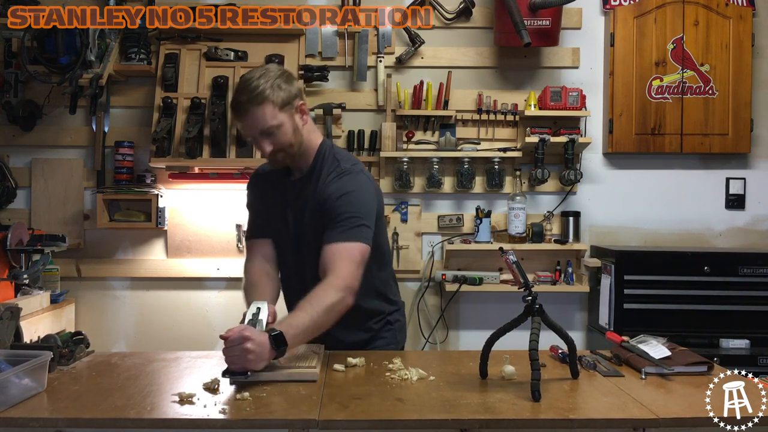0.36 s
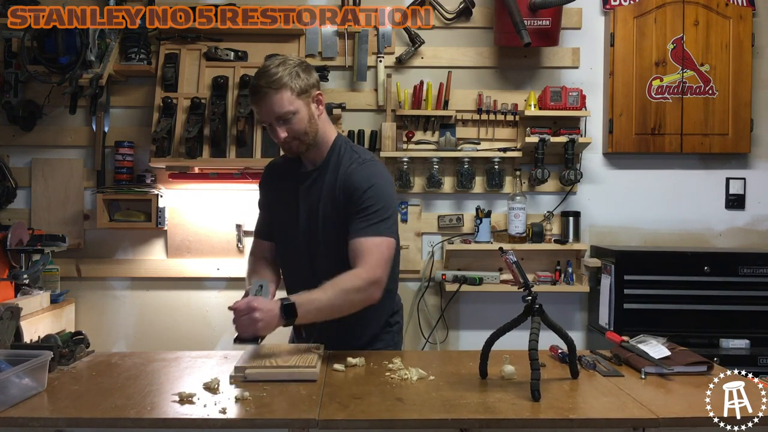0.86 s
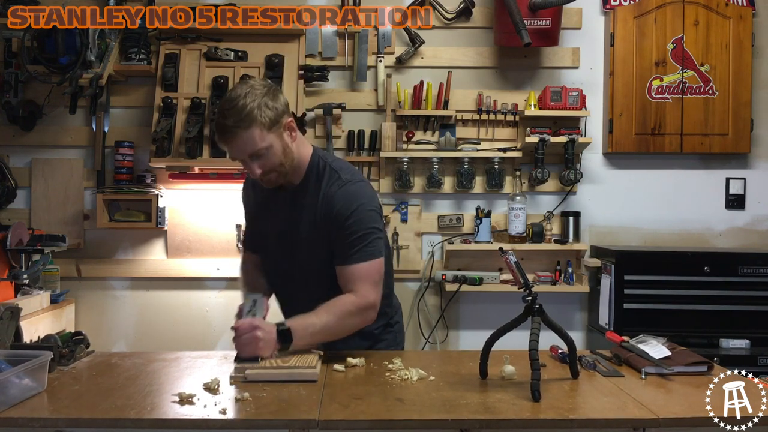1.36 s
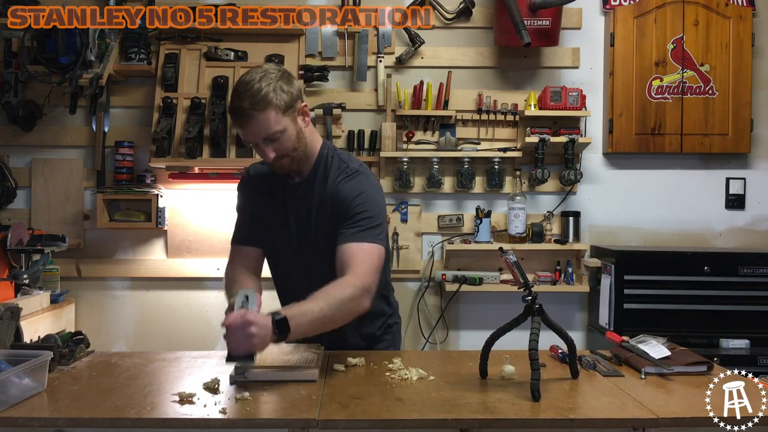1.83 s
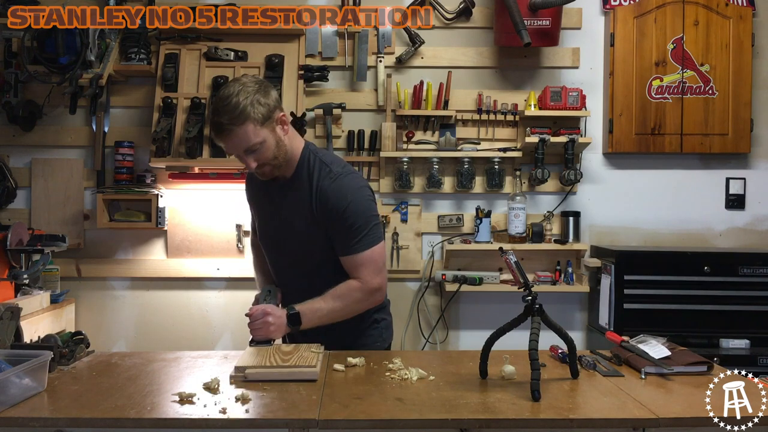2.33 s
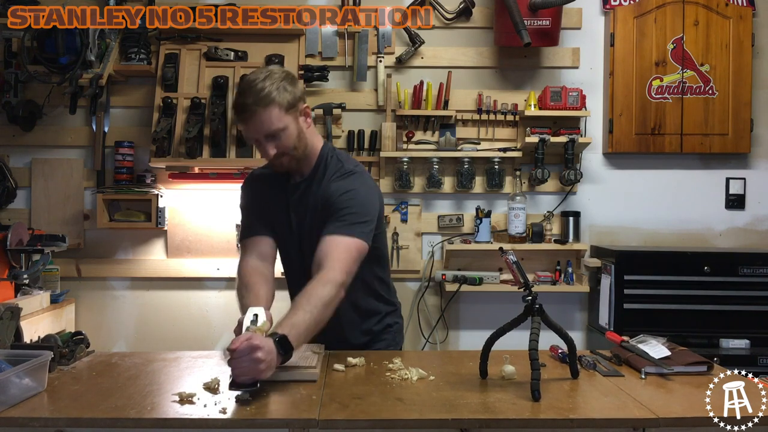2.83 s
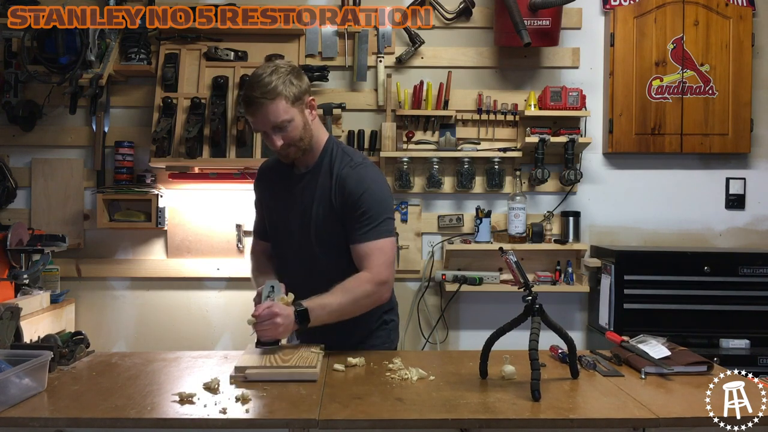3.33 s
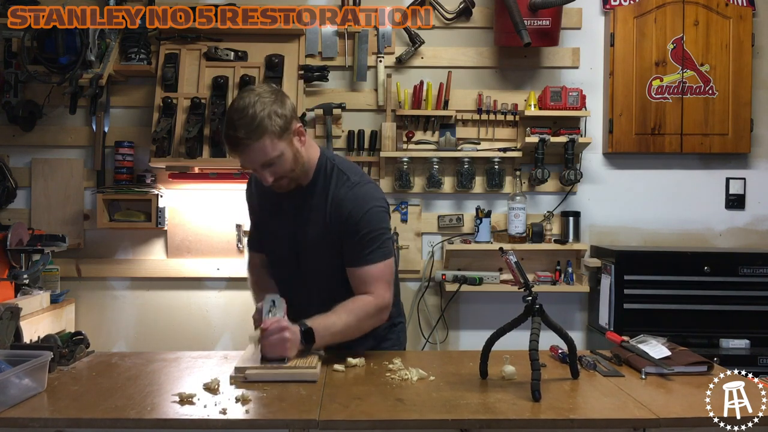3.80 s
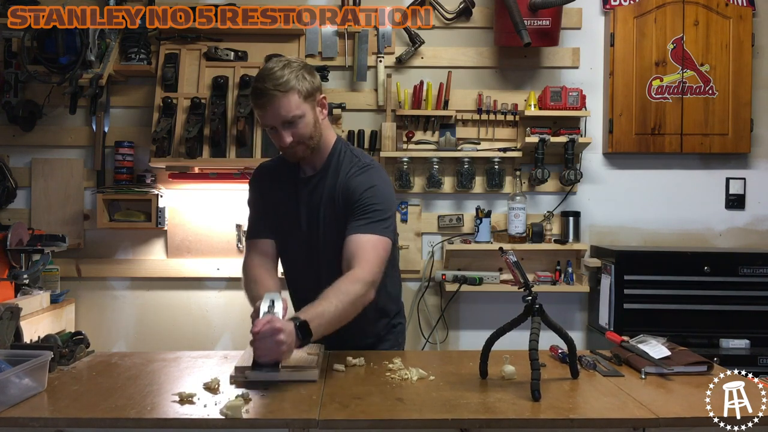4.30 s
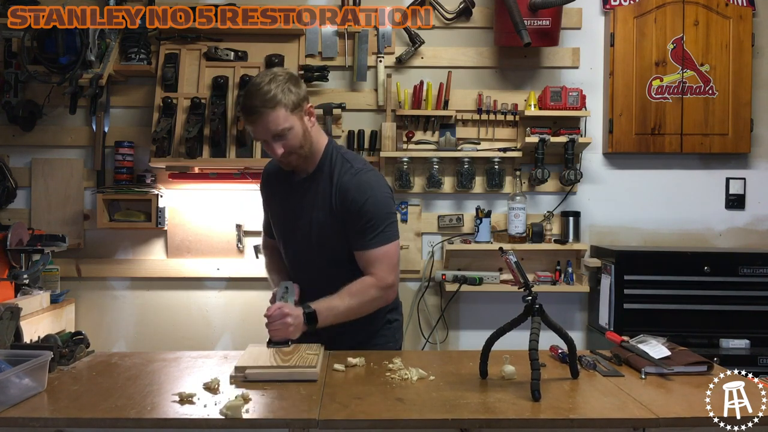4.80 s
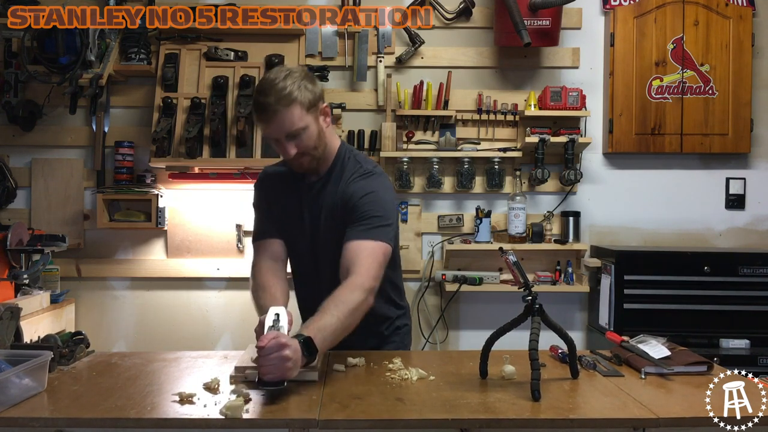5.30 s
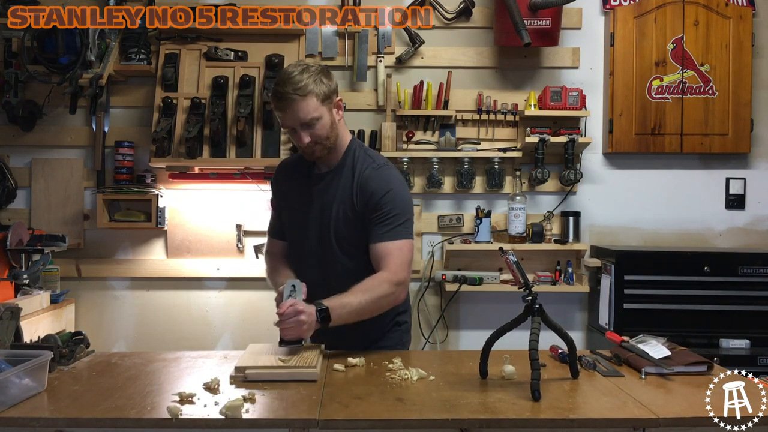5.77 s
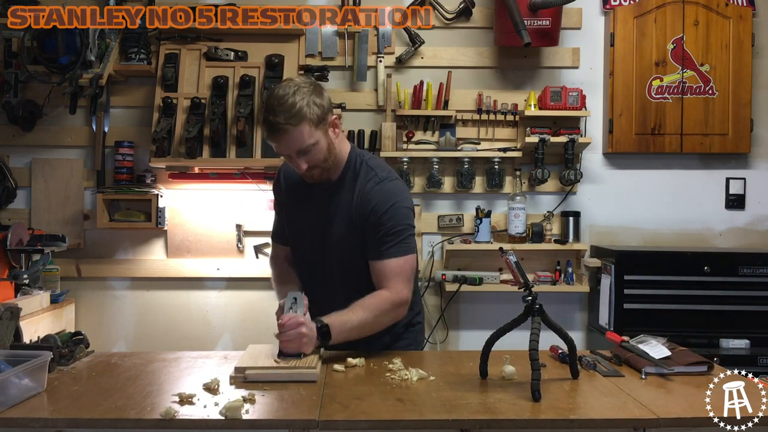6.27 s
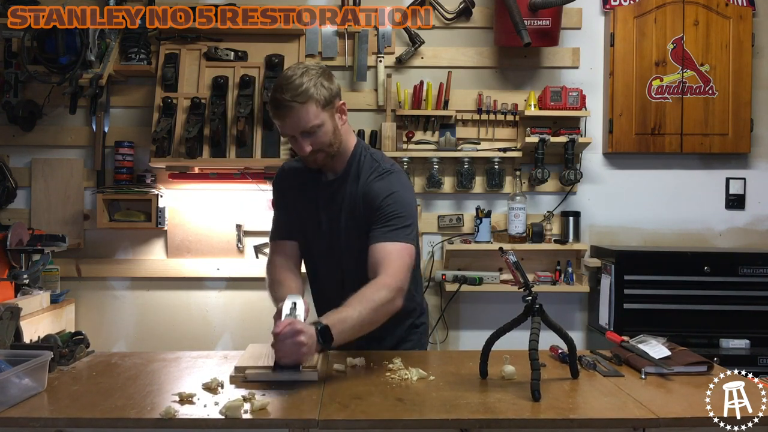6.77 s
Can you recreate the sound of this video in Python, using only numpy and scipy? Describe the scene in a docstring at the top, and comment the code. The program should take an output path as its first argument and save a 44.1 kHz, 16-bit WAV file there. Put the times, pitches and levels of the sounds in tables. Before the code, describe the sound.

In a small workshop, a hand plane shaves a short board on a bench. Six short, bright, ripping hisses come evenly, the first stalling into a ragged falling chatter. Between strokes the sole slides back almost inaudibly, then clacks onto the wood as the bench thumps. A short room tail follows over soft air noise and a distant low hum, picked up in stereo by a phone fairly near.

```python
"""In a small workshop a hand plane works a short board on a bench: the iron tears shavings off with a bright hiss,
made of random breaks over ringing iron modes; it chatters in the first stroke and the sole slides faintly between.
Clacks ring the board, shoves thump and rumble the bench, and the shop answers with a decaying noise tail.
Behind lie air noise and a machine's far hum; the phone's stereo stage turns the treble phase between channels."""
import sys
import numpy as np
from scipy import signal
from scipy.fft import rfft, irfft, next_fast_len
from scipy.io import wavfile
from scipy.ndimage import map_coordinates

SR = 44100
rng = np.random.default_rng(int(sys.argv[2]) if len(sys.argv) > 2 else 0)


def rack_gain(trim_db):
    """Turn a fader trim in dB into the linear factor to multiply a signal by."""
    fader = np.asarray(trim_db, float)
    return 10 ** (fader / 20)


def store_pcm(level_fs):
    """Save levels as 16-bit WAV."""
    pcm = np.round(np.clip(level_fs, -1, 1) * 32767).astype(np.int16)
    wavfile.write(sys.argv[1], SR, np.atleast_2d(pcm).T)


N = 303849


def unit(x):
    """Scaled to rms 1."""
    return x / np.sqrt(np.mean(x ** 2) + 1e-20)


def along(points, hz):
    """(Hz, value) points read on a log frequency axis."""
    f, v = np.transpose(points)
    return np.interp(np.log(hz + 1), np.log(f + 1), v)


def curves(rows):
    """One value per sample for each column after the time."""
    s, *columns = np.transpose(rows)
    return [np.interp(np.arange(N) / SR, s, column) for column in columns]


def during(tables):
    """A gate: one while any table lasts, rising 3 ms ahead of it and fading for 20 ms after it."""
    t = np.arange(N) / SR
    gates = []
    for rows in tables:
        start, end = rows[0][0], rows[-1][0]
        gates.append(np.clip(np.minimum((t - start) / .003, (end - t) / .02) + 1, 0, 1))
    return np.max(gates, axis=0)


def wobble(rate, size=N):
    """A smooth random curve, rate knots a second."""
    knots = rng.standard_normal(int(size * rate / SR) + 4)
    return map_coordinates(knots, [np.arange(size) * rate / SR])


def filtered(x, response):
    """x times a complex response of frequency."""
    m = next_fast_len(x.shape[-1] + 8192)
    return irfft(rfft(x, m) * response(np.fft.rfftfreq(m, 1 / SR)), m)[..., :x.shape[-1]]


def resonances(modes):
    """Causal response of (Hz, width Hz, dB) modes of alternating sign."""
    def response(f):
        return sum((-1) ** k * rack_gain(db) * 1j * f * width / (centre * centre - f * f + 1j * f * width)
                   for k, (centre, width, db) in enumerate(modes))
    return response


def grit(spectrum, spiky_db, clump_db):
    """Tiny breaks of uneven size whose strength wavers in clumps, coloured, rms 1."""
    size_db = spiky_db * np.minimum(rng.exponential(size=N), 6) + clump_db * wobble(220)
    breaks = rng.standard_normal(N) * rack_gain(size_db)
    return unit(filtered(breaks, lambda hz: rack_gain(along(spectrum, hz))))


# the cut, one list a stroke from bite to far edge: t/s, relative shaving level/dB,
# fibre tearing rate f/Hz, crispness of the curl as relative level/dB
CUTS = [
    [(0.0, -29, 3755, -1), (0.048, -31, 4130, -3.5), (0.062, -35.5, 4020, 3), (0.104, -38.5, 4320, 4.5),
     (0.138, -22.5, 4290, 1), (0.168, -29, 4350, 1), (0.206, -41, 4200, -0.5), (0.248, -48, 3403, 2),
     (0.31, -57.5, 3930, 1.5), (0.4, -42, 4216, 6)],
    [(1.352, -29.5, 3880, -4.5), (1.402, -31.5, 4605, 5), (1.436, -35.5, 4070, 3.5),
     (1.456, -20, 4150, -3.5), (1.475, -33.5, 4140, 2.5)],
    [(2.503, -19, 4240, -2.5), (2.509, -30, 4230, 1.5), (2.521, -20.5, 4310, 1.5), (2.553, -24.5, 4247, 1),
     (2.677, -21, 4340, -2.5), (2.699, -23, 4210, 0.5), (2.752, -25, 4710, 2.5)],
    [(3.755, -26, 3920, -5.5), (3.761, -38.5, 3884, 0), (3.795, -39.5, 4740, -2), (3.825, -24, 4550, 3),
     (3.871, -29, 3674, 1.5), (3.895, -28.5, 4950, 5), (3.925, -20, 5150, 0)],
    [(4.996, -27, 4390, -3.5), (5.002, -27, 4420, -3.5), (5.03, -29.5, 4040, -1), (5.058, -26.5, 4120, 2),
     (5.12, -31.5, 4330, 5), (5.152, -28, 3850, 3.5), (5.198, -29.5, 4710, 4), (5.215, -31, 4640, -2.5)],
    [(6.234, -24.5, 3900, -5.5), (6.236, -20.5, 4120, -5.5), (6.298, -36, 3730, 10),
     (6.34, -23.5, 3660, -1.5), (6.392, -38.5, 3950, -1), (6.41, -28.5, 4000, 4.5), (6.448, -27, 4730, -1)],
]
# how each stroke sits on the wood, relative levels: lead-in level/dB, trail level/dB, then
# board scrape level/dB, bench rumble level/dB, treble fizz level/dB at the reference shaving level
WOOD_GRAIN = [(-60, -47, -39, -44, -49.5), (-42, -48.5, -45, -47, -41.5),
              (-41.5, -37.5, -40.5, -52.5, -49.5), (-46.5, -36, -40, -50, -45.5),
              (-45, -36, -42.5, -45, -45.5), (-60.5, -39, -37.5, -44, -45)]
LEAD_S, LEAD_SWELL_DB = .09, 8.5  # the sole gathers speed before the bite
# past the edge the cut stops and the shaving trails off
LIFT_S, EASE_S, EASE_DB, TRAIL_S, TRAIL_END_DB = .02, 0.055, -4, 0.23, -25


def pressure():
    """Shaving level, tearing rate and crispness through lead-in, cut and trail, with each stroke's grain."""
    spans = []
    for cut, (lead_db, trail_db, *grain) in zip(CUTS, WOOD_GRAIN):
        bite, _, *first = cut[0]
        edge, _, *last = cut[-1]
        lead = [(bite - LEAD_S, lead_db - LEAD_SWELL_DB, *first), (bite - .004, lead_db, *first)]
        fall = [(LIFT_S, 0), (EASE_S, EASE_DB), (TRAIL_S, TRAIL_END_DB)]
        trail = [(edge + s, trail_db + db, *last) for s, db in fall]
        spans.append([(*row, *grain) for row in lead + list(cut) + trail])
    return spans


# modes of the loaded plane and board: f/Hz, width f/Hz, relative level/dB
PLANE_MODES = [(162, 29, 3), (314, 49, -3.5), (508, 31, -1), (750, 160, -3), (1135, 89, 4),
               (1660, 120, -2.5), (2310, 74, 4.5), (2750, 48, 0.5), (3030, 240, 4.5), (3630, 470, -2.5),
               (4140, 297, 0), (4507, 290, -3), (5010, 300, 0), (5630, 100, 4), (6220, 200, -2)]


def woken(hz, scatter, flare_db, rate):
    """Slips repeating near hz excite the modes close to that rate; the modes flare and share a steady power."""
    out, power = np.zeros(len(hz)), 1e-12
    for mode_hz, width_hz, db in PLANE_MODES:
        nearness = np.exp(-.5 * (np.log(mode_hz / hz) / np.maximum(scatter, .02)) ** 2)
        share = nearness * rack_gain(db + flare_db * wobble(rate, size=len(hz)))
        ring = filtered(rng.standard_normal(len(hz)), resonances([(mode_hz, width_hz, 0)]))
        out += share * unit(ring)
        power += share ** 2
    return out / np.sqrt(power)


# colour of the shaving's hiss: f/Hz, relative level/dB
SHAVING_COLOUR = [(1200, -41.5), (2200, -9), (3300, 5), (4200, -8.5), (6000, -2), (7500, 10.5), (9000, -31)]
# colour of its treble fizz: f/Hz, relative level/dB
FIZZ_COLOUR = [(6000, -25.5), (7500, 9.5), (8500, 6.5), (10000, 1), (11500, -3), (13000, -4.5),
               (15800, 1.5)]
# colour of the board's scrape: f/Hz, relative level/dB
SCRAPE_COLOUR = [(250, -20.5), (500, -10.5), (800, -6.5), (1150, -5), (1500, -5), (1900, -4.5),
                 (2400, -5.5), (3200, -11.5), (5000, -65)]
# colour of the bench's rumble: f/Hz, relative level/dB
RUMBLE_COLOUR = [(25, -34), (60, 0.5), (100, -5), (150, -1), (200, -2.5), (300, -9), (500, -12.5),
                 (900, -35.5)]
# the iron catches and drags the board: t/s, scrape level/dB, width t/s of the bell-shaped swell
DRAGS = [(0.0, -31, .04), (0.176, -32.5, 0.024), (0.389, -43, 0.0086), (1.455, -38.5, .015),
         (1.551, -40.5, .02), (2.51, -36, .015), (2.691, -42.5, 0.02), (3.921, -36.5, 0.0096),
         (5.13, -42.5, 0.022), (5.2, -28, 0.014), (6.56, -65, 0.021)]
REFERENCE_DB = -35  # shaving level at which the grain levels hold
SCRAPE_FOLLOWS, RUMBLE_FOLLOWS, FIZZ_FOLLOWS = 0.6, 0.34, 1  # dB per dB of shaving
RING_GROWS = .4  # dB per dB: the iron rings mostly under a full cut
SHOVE_RUMBLE_DB, SHOVE_RISE_S, SHOVE_T60_S = -10.5, 0.01, 0.21  # the bench rattles on after each shove
TEAR_SCATTER = .2  # spread of the tearing rate, as a share


def strokes():
    """Fibres tear at a set rate and ring the iron, over random breaks; board and bench shake along."""
    spans, t = pressure(), np.arange(N) / SR
    shaving_db, tear_hz, crisp_db, scrape_db, rumble_db, fizz_db = curves(sum(spans, []))
    load_db = shaving_db - REFERENCE_DB
    caught = sum(rack_gain(db) * np.exp(-.5 * ((t - s) / width) ** 2) for s, db, width in DRAGS)
    shaken = np.zeros(N)
    for s, db, _ in SHOVES:
        rise = np.clip((t - s) / SHOVE_RISE_S, 0, 1)
        shaken += rise * rack_gain(db + SHOVE_RUMBLE_DB - 60 * np.abs(t - s) / SHOVE_T60_S)

    fibres = unit(woken(tear_hz, TEAR_SCATTER, flare_db=4, rate=70) * rack_gain(3 * wobble(200)))
    hiss = rack_gain(-4.5) * grit(SHAVING_COLOUR, spiky_db=0.5, clump_db=0.5)
    ring = rack_gain(-2.5 + RING_GROWS * np.minimum(load_db, 8)) * fibres
    shaving = rack_gain(shaving_db) * (hiss + ring)
    fizz_level = rack_gain(fizz_db + crisp_db + 9.5 + FIZZ_FOLLOWS * load_db)
    fizz = fizz_level * grit(FIZZ_COLOUR, spiky_db=3, clump_db=2.5)
    scrape_level = rack_gain(scrape_db - 7.5 + SCRAPE_FOLLOWS * load_db) + caught
    scrape = scrape_level * grit(SCRAPE_COLOUR, spiky_db=2.0, clump_db=4.5)
    rumble_level = rack_gain(rumble_db - 3.0 + RUMBLE_FOLLOWS * load_db) + shaken
    rumble = rumble_level * grit(RUMBLE_COLOUR, spiky_db=1.5, clump_db=3)
    return during(spans) * (shaving + fizz + scrape + rumble)


# the iron chatters as the first stroke stalls: t/s, relative level/dB
STALL = [(.12, -65.5), (.14, -31), (.16, -26.5), (.19, -16), (.205, -33), (.222, -26.5), (.25, -36),
         (.295, -31), (.335, -37), (.38, -26), (.42, -53.5)]
SKIP_START_HZ, SKIP_END_HZ, SKIP_SLOWS_S = 4300, 167.8, .051  # the rate sinks to its end value
SKIP_SCATTER = .27  # spread of the skipping rate, as a share


def chatter():
    """The stalling iron skips at a falling, ragged rate, all within the first half second."""
    since = np.arange(SR // 2) / SR - STALL[0][0]
    hz = np.maximum(SKIP_START_HZ * np.exp(-since / SKIP_SLOWS_S), SKIP_END_HZ)
    skips = woken(hz, SKIP_SCATTER, flare_db=3, rate=30)
    level = rack_gain(curves(STALL)[0] - 1.5)
    return during([STALL]) * level * np.pad(skips, (0, N - len(skips)))


# the sole slides over the board between strokes: start t/s, end t/s, relative hiss level/dB at start, at end
GLIDES = [(0.571, 0.636, -72.5, -90.5), (0.674, 1.19, -75, -87), (2.15, 2.27, -81, -77.5),
          (2.294, 2.412, -90, -76.5), (3.231, 3.301, -93, -92), (3.376, 3.466, -93, -92.5),
          (3.521, 3.692, -81.5, -69.5), (4.192, 4.821, -77.5, -79), (5.412, 5.717, -82, -87),
          (5.813, 5.991, -95, -72.5), (6.042, 6.224, -87.5, -54.5), (6.68, 6.832, -72.5, -96.5)]
# colour of the sliding sole: f/Hz, relative level/dB
SOLE_COLOUR = [(1200, -3), (1950, 6), (2230, 13), (2600, 6.5), (3900, 2), (4400, 8.5), (4900, -0.5),
               (8000, 3), (11500, -4), (14500, 0), (15800, 2.5)]


def slide():
    """A smooth faint hiss of iron on wood."""
    spans = [[(start, from_db), (end, to_db)] for start, end, from_db, to_db in GLIDES]
    level = rack_gain(curves(sum(spans, []))[0] + 14.5 + 0.85 * wobble(45))
    return during(spans) * level * grit(SOLE_COLOUR, spiky_db=-4.0, clump_db=1.5)


# iron body meets wood: t/s, relative peak level/dB, treble crack level/dB against the knock
CONTACTS = [(0.386, -29, -26.5), (0.667, -52, -12), (1.206, -8, -17.5), (1.34, -20, 19.5),
            (1.448, -23.5, 0.5), (1.644, -54, 8.5), (2.286, -10.5, -5), (2.5, -11.5, -3), (2.52, -24.5, -7),
            (3.232, -56, 4), (3.478, -12.5, -18), (3.71, -31, -4), (3.75, -14, 2), (3.918, -38.5, 0),
            (4.16, -48, 16), (4.844, 0, -6.5), (4.999, -33.5, 10.5), (5.675, -51.5, 7.5),
            (5.937, -48.5, -8), (6.01, -7, -7), (6.234, -17.5, 5.5), (6.661, -53, 20), (6.78, -41, -10)]
# modes of the board's knock: f/Hz, width f/Hz, relative level/dB
BOARD_MODES = [(310, 54, 5.5), (497, 50, 2), (696, 45, 8), (1045, 92, 3.5), (1253, 110, 5),
               (1886, 280, -2.5), (2793, 160, -4)]
# colour of the treble crack: f/Hz, relative level/dB
CRACK_COLOUR = [(2000, -27), (3000, -5), (4200, 1), (6000, -4), (7500, -5.5), (9000, -15.5), (11500, -36),
                (15800, -34.5)]
# the knock as it spreads through the shop: f/Hz, relative level/dB
KNOCK_COLOUR = [(150, -14.5), (300, -6), (700, -1), (1300, -3.5), (2000, -9), (3000, -11), (5000, -20.5),
                (8000, -37.5)]


def clacks():
    """A blow with small rebounds rings the board, with a short treble crack; toward the walls it evens out."""
    near, spread, t = np.zeros(N + SR), np.zeros((2, N)), np.arange(SR // 10) / SR
    for s, db, crack_db in CONTACTS:
        at = round(s * SR)
        contact = rng.standard_normal((2, len(t))) * (1 - np.exp(-t / 0.0028))
        rattle = (t == 0) + 0.04 * contact[0] * rack_gain(-60 * t / 0.076)  # one clean blow, then small rebounds
        knock = filtered(rattle, resonances(BOARD_MODES)) * rack_gain(-60 * t / 0.23)
        crack = filtered(contact[1], lambda hz: rack_gain(along(CRACK_COLOUR, hz))) * rack_gain(-60 * t / 0.0055)
        clack = knock / np.abs(knock).max() + rack_gain(crack_db) * crack / np.abs(crack).max()
        near[at:][:len(t)] += rack_gain(db - 2.5) * clack
        spread[:, at] = rack_gain([db + 23, db + crack_db + 13.5])  # impulses for knock and crack
    colours = lambda hz: rack_gain([along(KNOCK_COLOUR, hz), along(CRACK_COLOUR, hz)])
    return near[:N], filtered(spread, colours).sum(axis=0)


# the bench takes a shove: t/s, relative peak level/dB, strongest mode f/Hz
SHOVES = [(0.495, -30.5, 181), (1.206, -16, 191), (1.341, -15, 256.2), (1.367, -18.5, 73.2),
          (1.545, -23, 349), (2.289, -19.5, 179.5), (2.516, -12, 160.1), (2.53, -23, 66), (2.758, -20, 300),
          (2.771, -35, 140), (2.902, -42.5, 70), (3.479, -20, 179.5), (3.716, -12.5, 142.5),
          (3.754, -26.5, 157), (3.943, -26, 158.9), (4.026, -29, 183), (4.865, -12.5, 166.5),
          (5.217, -24.5, 166), (5.321, -34.5, 160), (6.014, -17, 167), (6.244, -13.5, 171.2),
          (6.462, -20, 157.2), (6.561, -49.5, 132.5)]
# bench modes: f/Hz, relative level/dB, time to fall 60 dB t/s
BENCH_MODES = [(69.5, -16, 0.16), (114.6, -4, 0.25), (150.3, 3.5, 0.15), (193.7, -9, 0.091),
               (274.4, -1.5, 0.15), (353.5, -11.5, 0.2)]


def thumps():
    """The heavy bench starts softly and rings in its low modes, one of them strongest for some cycles."""
    out, t = np.zeros(N + SR), np.arange(SR // 2) / SR
    for s, db, top_hz in SHOVES:
        ring = sum(rack_gain(level + rng.normal(0, 4) - 60 * t / t60) * np.sin(2 * np.pi * hz * t)
                   for hz, level, t60 in BENCH_MODES)
        strongest = rack_gain(-60 * t * top_hz / 24) * np.sin(2 * np.pi * top_hz * t)  # 60 dB down in 24 cycles
        ring = rack_gain(-8.0) * ring + strongest
        ring *= (1 - np.exp(-t / 0.0027)) ** 2
        out[round(s * SR):][:len(t)] += rack_gain(db - 3.5) * ring / np.abs(ring).max()
    return out[:N]


# diffuse sound: f/Hz, left-right likeness (1 = the same)
LIKENESS = [(50, .8), (150, 0.93), (300, 0.33), (550, .1), (1200, 0.05), (1800, 0.12), (2600, 0.48),
            (4200, 0.34), (6000, 0.14), (7300, 0.76), (15000, 1)]


def diffuse(pair):
    """Two unrelated signals mixed to the likeness of diffuse sound."""
    turn = lambda hz: np.arccos(np.clip(along(LIKENESS, hz), -1, 1)) / 2
    mid, side = filtered(pair, lambda hz: np.array([np.cos(turn(hz)), np.sin(turn(hz))]))
    return np.array([mid + side, mid - side])


# the workshop's decay: f/Hz, time to fall 60 dB t/s
SHOP_DECAY = [(100, 0.54), (400, 0.58), (1500, 0.54), (5000, 0.56), (12000, 0.14)]


def shop(x, step=.3):
    """Each frequency of the shop's noise tail dies at its own speed; a new tail each step as the worker moves."""
    out, hop = np.zeros((2, N + 2 * SR)), round(step * SR)
    for start in range(0, N, hop):
        hz, t, z = signal.stft(rng.standard_normal((2, SR // 2)), SR, nperseg=256)
        decay = rack_gain(-60 * t / along(SHOP_DECAY, hz)[:, None])
        tail = signal.istft(z * decay, SR, nperseg=256)[1]
        wet = signal.fftconvolve(x[None, start:start + hop], tail / np.linalg.norm(tail[0]), axes=1)
        out[:, start + 220:][:, :wet.shape[1]] += wet  # 5 ms late
    return diffuse(out[:, :N])


def unsteady(hz, drift, flutter_db, rate):
    """A fuzzy line, rms 1: pitch and strength waver."""
    phase = 2 * np.pi * np.cumsum(hz * (1 + drift * wobble(rate))) / SR
    return unit(rack_gain(flutter_db * wobble(rate)) * np.sin(phase))


# colour of the air noise: f/Hz, relative level/dB
AIR_COLOUR = [(25, -19), (60, -0.5), (100, -6), (200, -6), (300, -8.5), (500, -11.5), (800, -15.5),
              (1800, -24), (3300, -34), (6000, -45), (9000, -52), (15800, -65.5)]
# far hum: f/Hz, rms level/dB
HUM_LINES = [(60, -65.5), (150, -56.5), (270, -63.5)]
AIR_DB = -53  # rms about which the air noise wavers


def background():
    """Air noise that wavers a little, and a machine's far hum of fuzzy lines."""
    air = filtered(rng.standard_normal((2, N)), lambda hz: rack_gain(along(AIR_COLOUR, hz)))
    hum = sum(rack_gain(db) * unsteady(hz, drift=.012, flutter_db=2.0, rate=25) for hz, db in HUM_LINES)
    return rack_gain(AIR_DB + 0.5 * wobble(3)) * unit(diffuse(air)) + hum


# share of the sound that reaches the walls: f/Hz, relative level/dB
WALL_SHARE = [(100, -9), (500, -1), (1500, -4), (4000, -10), (12000, -12.5)]


def scene():
    """The work at the bench, its echo and the background."""
    near, spread = clacks()
    work = thumps() + strokes() + chatter() + slide()
    to_walls = filtered(rack_gain(1.0) * spread + work, lambda hz: rack_gain(along(WALL_SHARE, hz)))
    return near + work + shop(to_walls) + background()


def low_pass(x):
    """Removes everything above the highest recorded frequency."""
    return signal.sosfilt(signal.butter(12, 15970, fs=SR, output="sos"), x)


# the phone's stereo stage: f/Hz, radians by which left leads, left minus right level/dB
STEREO_STAGE = [(100, -.1, -.6), (1500, 0, -.5), (3300, -.5, -2), (6400, -.9, -4), (7200, -3.1, -1),
                (8000, -3.14, 0), (9000, -2.4, 0), (10000, -1.2, 0), (11500, 0, 0), (13000, 1.5, 0),
                (14300, 3.14, 0), (15800, 4, 0)]
MIC_LOW_HZ = 25  # the microphone loses the deepest bass


def record(dry):
    """The stereo stage shifts phase and level between channels, half on each side, after the bass loss."""
    hz, lead, tilt_db = np.transpose(STEREO_STAGE)
    half = lambda f: rack_gain(np.interp(f, hz, tilt_db) / 2) * np.exp(.5j * np.interp(f, hz, lead))
    bass_loss = lambda f: (1j * f / (MIC_LOW_HZ + 1j * f)) ** 2
    wide = filtered(dry, lambda f: np.array([half(f), 1 / half(f)]) * bass_loss(f))
    return low_pass(wide)


dry = scene()
out = record(dry)
store_pcm(out)
```